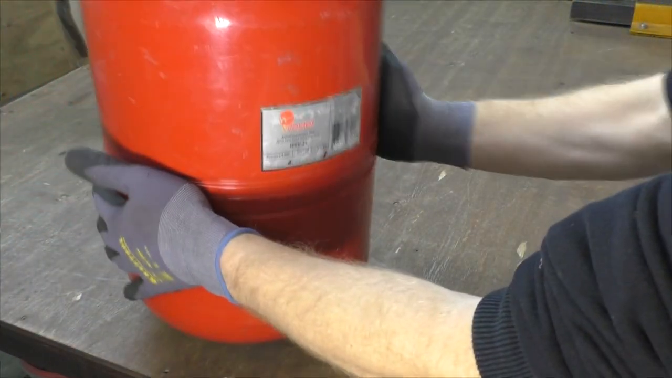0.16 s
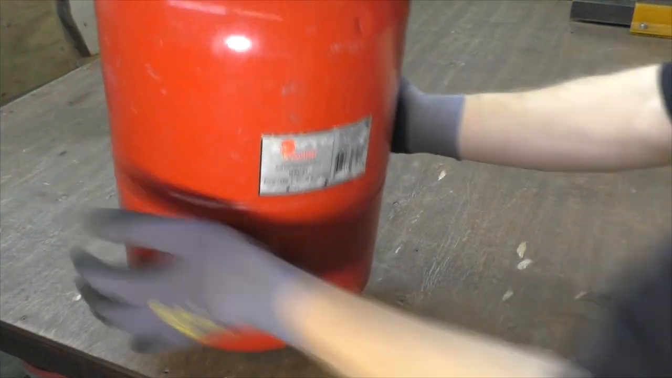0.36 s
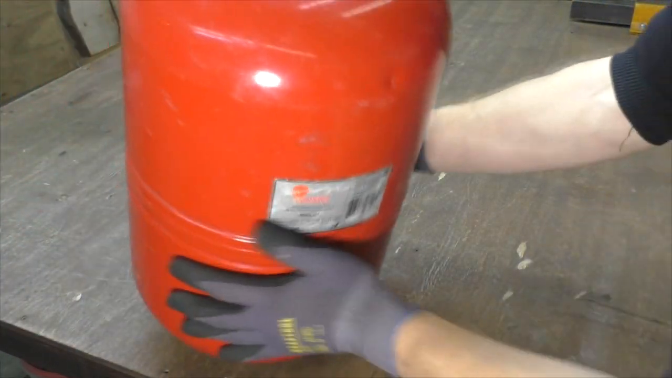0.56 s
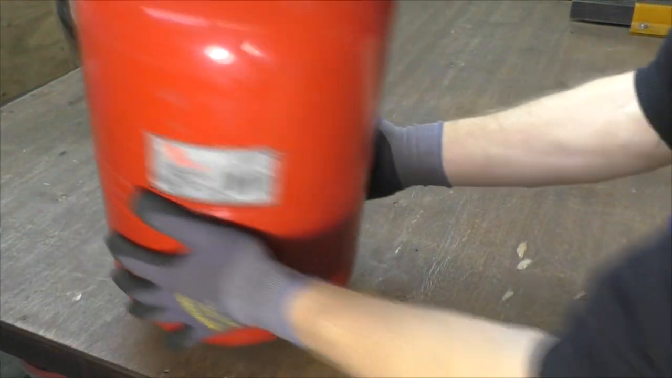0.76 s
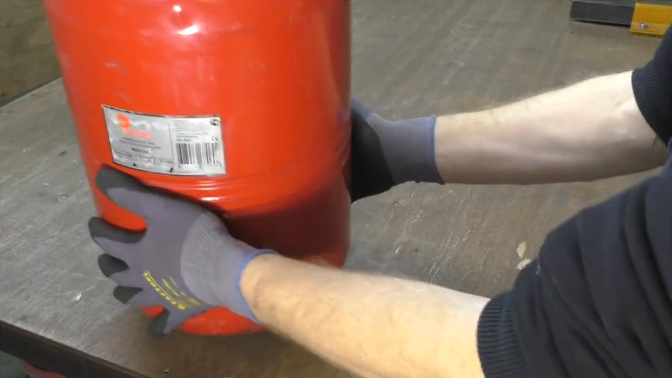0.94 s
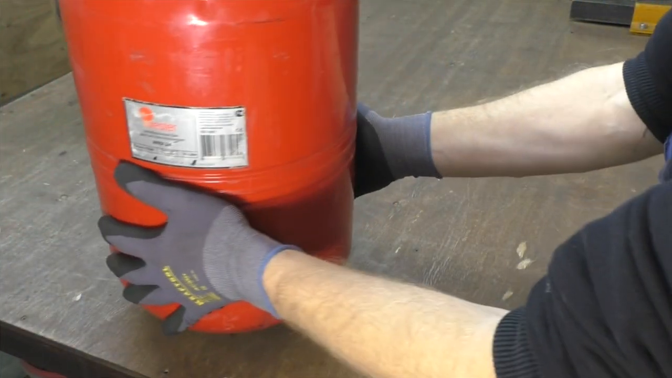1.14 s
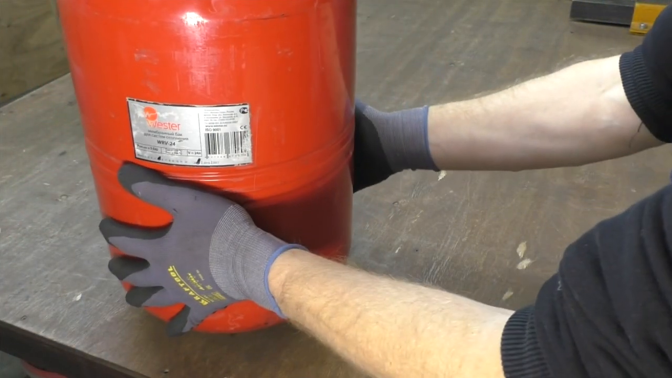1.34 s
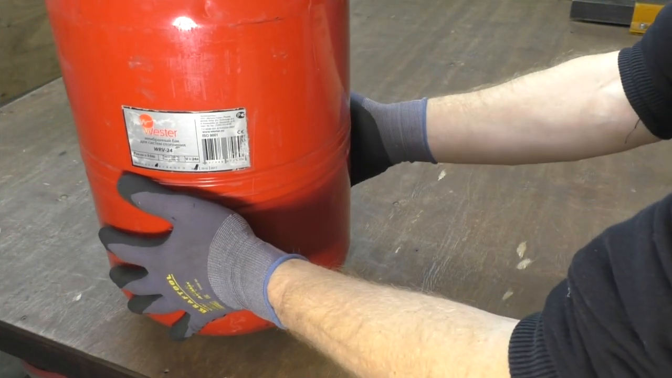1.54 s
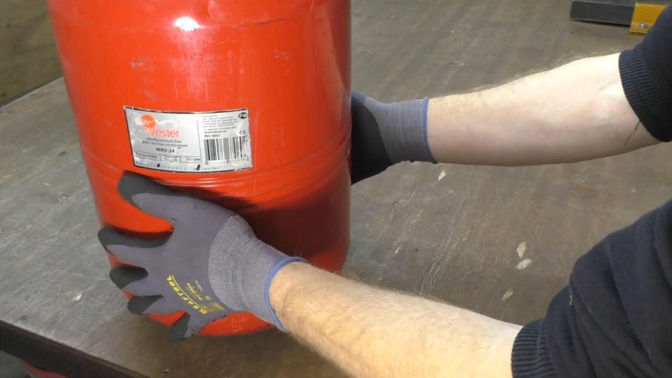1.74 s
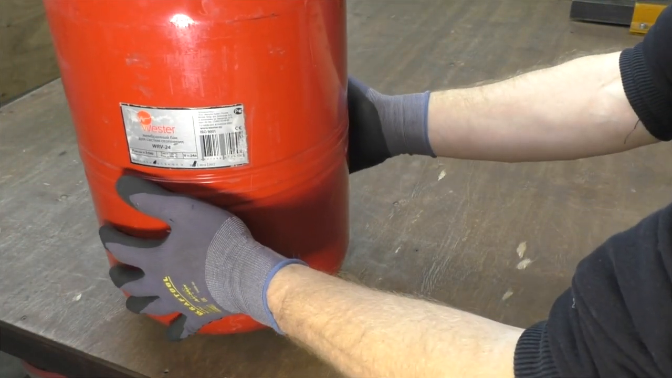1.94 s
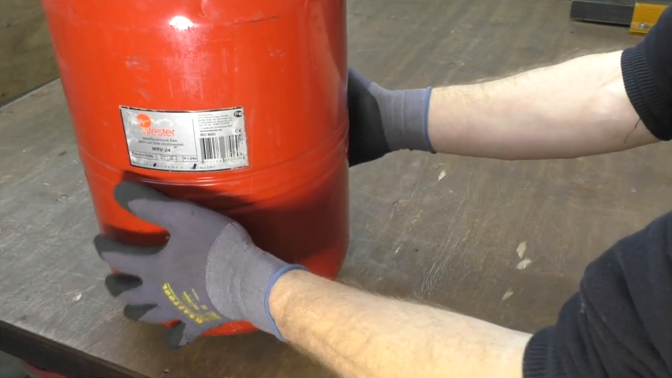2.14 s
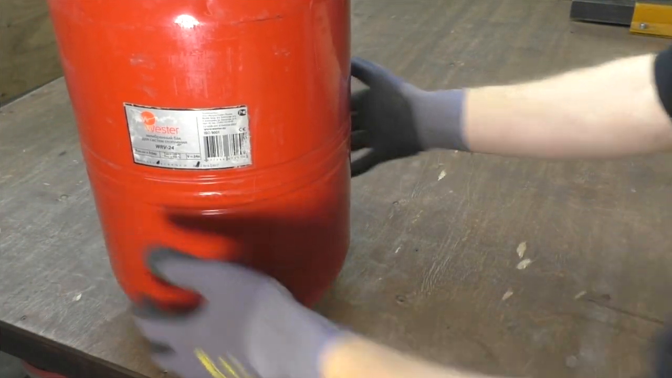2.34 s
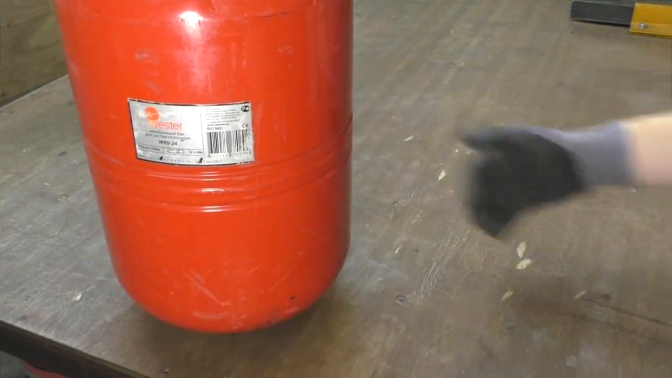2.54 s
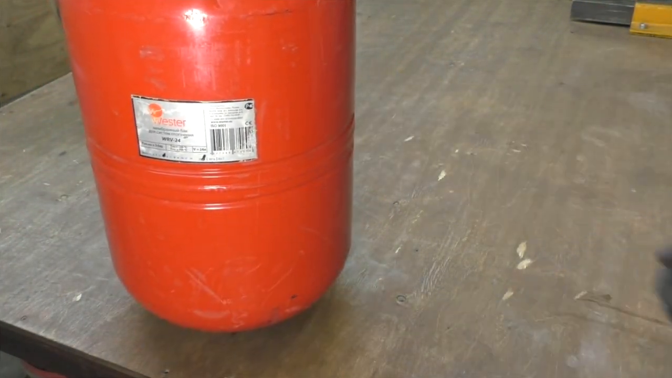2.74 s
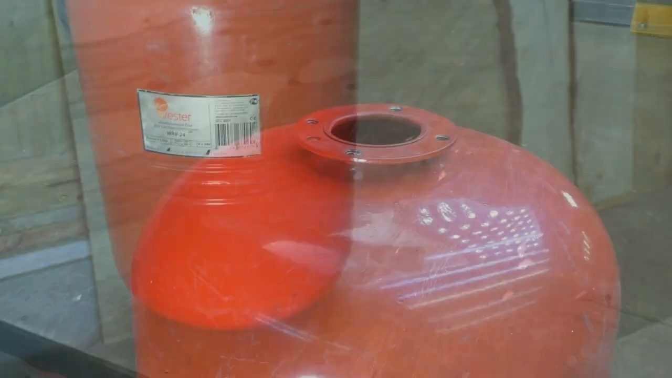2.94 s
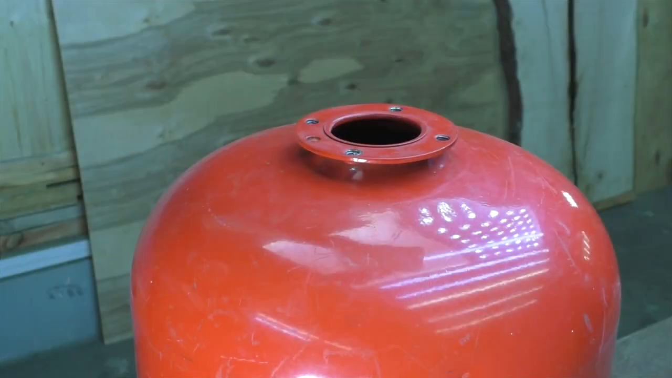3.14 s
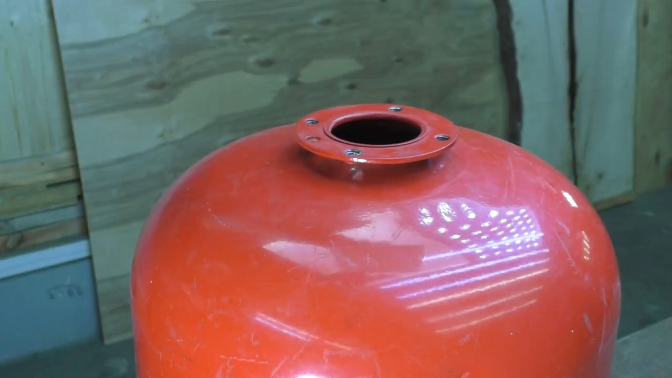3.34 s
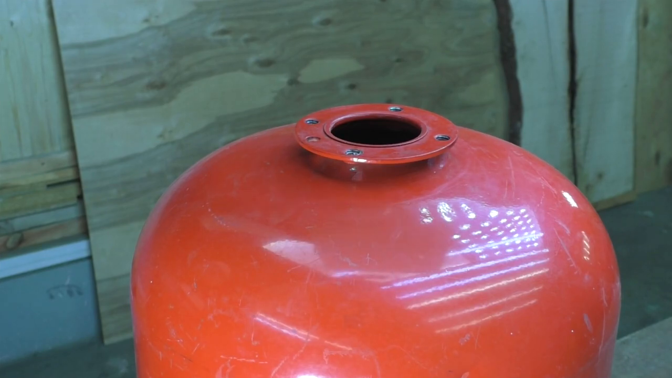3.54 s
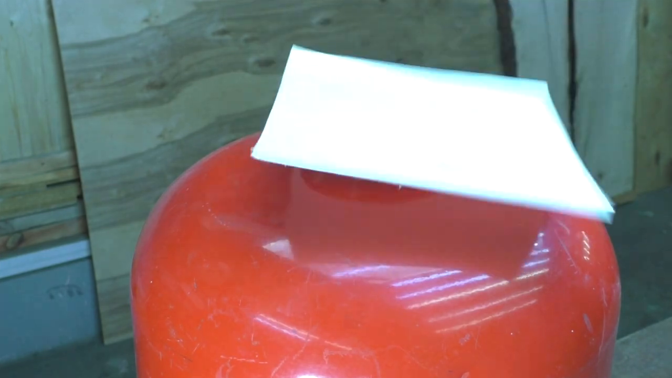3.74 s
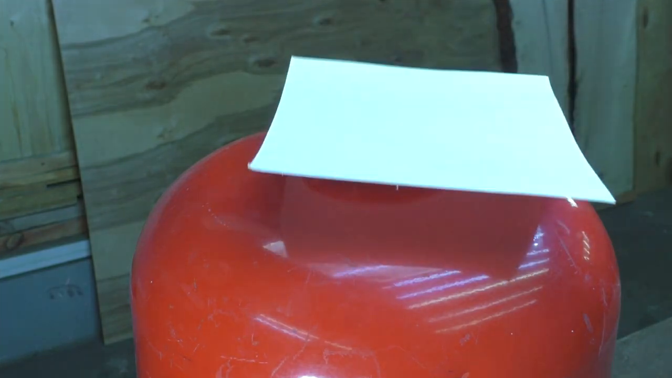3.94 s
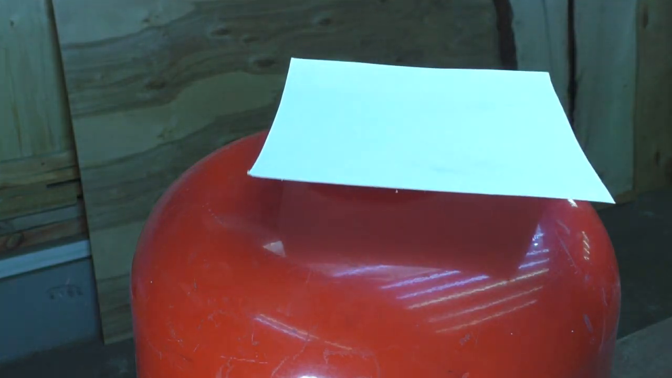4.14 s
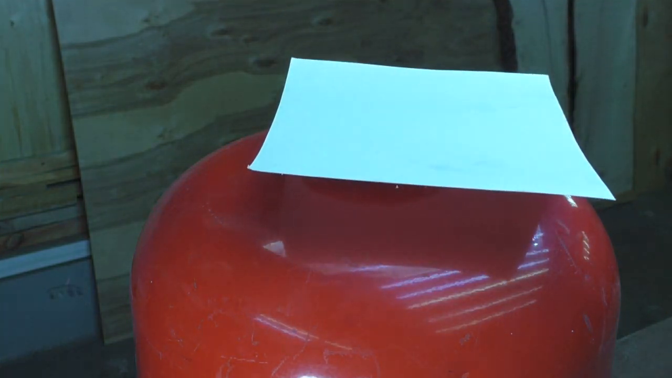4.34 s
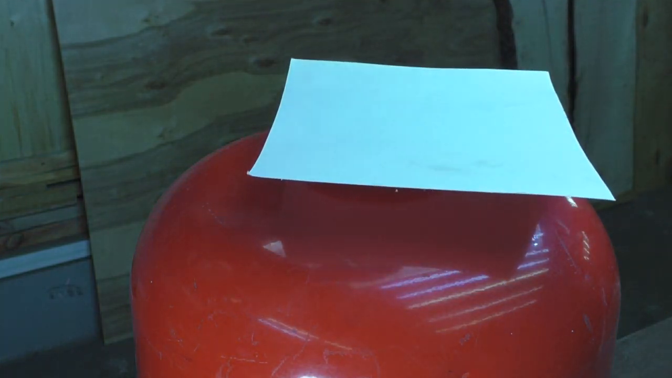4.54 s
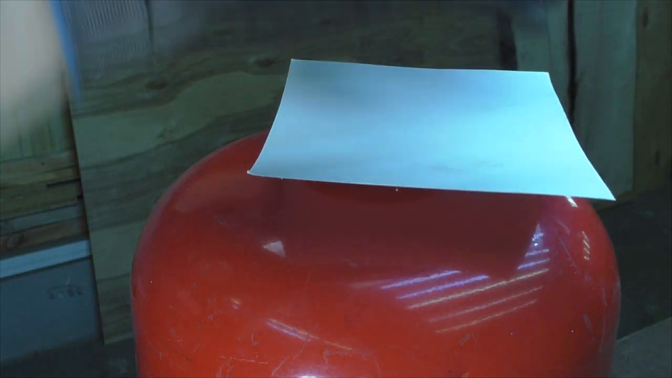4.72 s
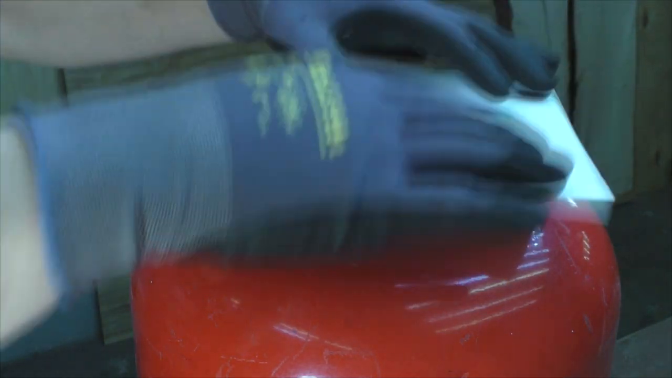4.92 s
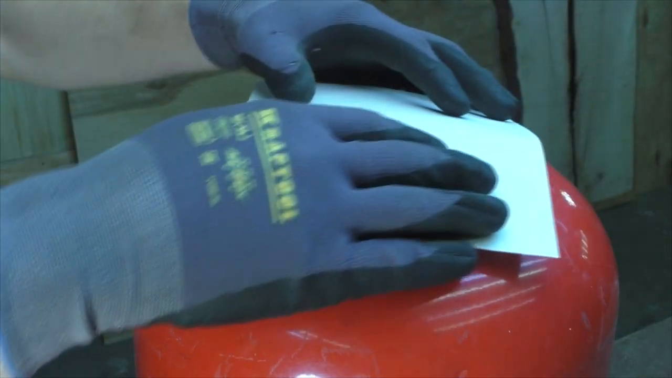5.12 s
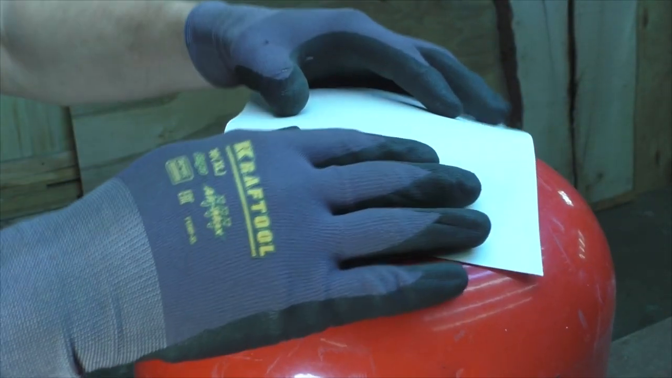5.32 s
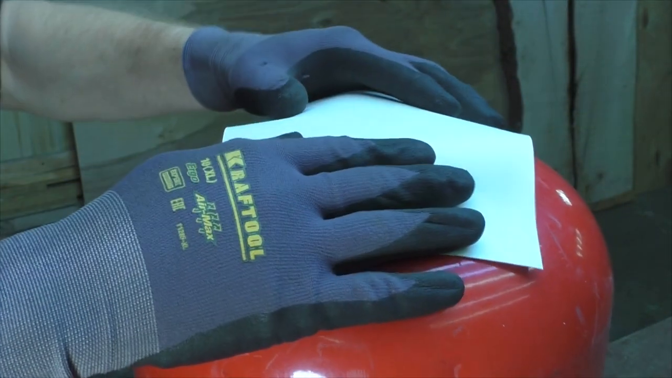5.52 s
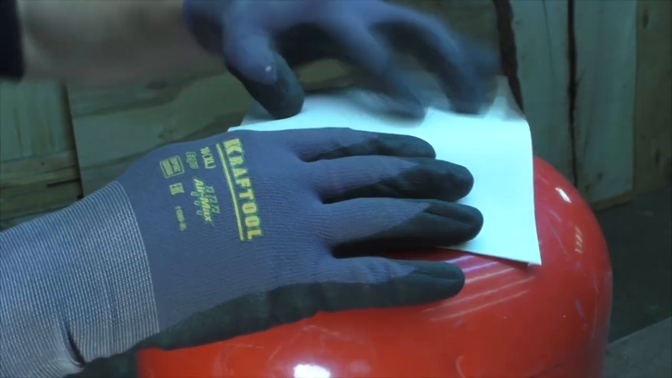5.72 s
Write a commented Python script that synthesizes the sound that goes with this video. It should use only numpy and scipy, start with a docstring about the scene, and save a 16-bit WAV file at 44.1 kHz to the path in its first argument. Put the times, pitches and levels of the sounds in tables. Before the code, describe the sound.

In a small quiet workshop, a faint scrape leads to a hard, hollow clang as an empty steel tank lands on a wooden bench. It grinds with a short high squeal, a low hum and lighter knocks, then settles. Near silence follows, with slight sleeve rustles. A stiff sheet slaps sharply on the metal, then gloved hands tap and rub it. Close stereo microphone, bench somewhat to the right.

```python
"""In a small, quiet workshop an empty steel tank is set down on a wooden bench, twisted and rocked to rest.
Then a stiff sheet of paper is slapped onto its flange, and gloved hands press and smooth it down.
Impacts are clicks, dense clangs and decaying shell modes; sliding is a train of random slips through
resonances; the squeal is unsteady tones and the hum one cavity tone. The bench lies a little to the right."""
import sys
import numpy as np
from scipy import signal
from scipy.fft import rfft, irfft, next_fast_len
from scipy.io import wavfile
from scipy.ndimage import map_coordinates

SR = 44100
rng = np.random.default_rng(int(sys.argv[2]) if len(sys.argv) > 2 else 0)


def file_out(sig):
    """Save sig as 16-bit WAV at sys.argv[1]."""
    # one column per channel
    cols = np.atleast_2d(sig).T
    # limit, then scale
    lim = np.clip(cols, -1, 1)
    pcm = np.round(lim * 32767).astype(np.int16)
    wavfile.write(sys.argv[1], SR, pcm)


N = 258867  # samples


def amp(db):
    """Level law: decibels to amplitude gain."""
    return 10 ** (np.asarray(db) / 20)


def unit(x):
    """Normalisation: x scaled to rms 1."""
    return x / np.sqrt(np.mean(x ** 2) + 1e-20)


def along(points, hz):
    """Logarithmic frequency scale: (Hz, value) points interpolated on a log axis."""
    f, v = np.transpose(points)
    return np.interp(np.log(hz + 1), np.log(f + 1), v)


def add(track, start_s, sound):
    """Superposition: mix a sound into the track from start_s on, cut at the end of the track."""
    part = track[..., round(start_s * SR):][..., :sound.shape[-1]]
    part += sound[..., :part.shape[-1]]


def filtered(x, response):
    """Linear filtering: the spectrum of x times a response of frequency."""
    n = x.shape[-1]
    padded = next_fast_len(n + 8192, True)
    hz = np.fft.rfftfreq(padded, 1 / SR)
    return irfft(rfft(x, padded) * response(hz), padded)[..., :n]


def resonance(f, centre_hz, width_hz, lift_db):
    """Damped resonator: a response of 1 that rises by lift_db at its centre."""
    damping = 1j * f * width_hz
    return 1 + (amp(lift_db) - 1) * damping / (centre_hz ** 2 - f * f + damping)


def wobble(rate):
    """Random modulation: a smooth curve through rate random knots a second."""
    knots = rng.standard_normal(int(N * rate / SR) + 4)
    return map_coordinates(knots, [np.arange(N) * rate / SR])


def swell(start, rise, hold, fade):
    """Envelope: a linear rise to 1, a hold and an exponential decay; all times in seconds."""
    t = np.arange(N) / SR - start
    return np.clip(t / rise, 0, 1) * np.exp(-np.maximum(t - rise - hold, 0) / fade)


def blend(pair, alike):
    """Interchannel coherence: two unrelated signals become a left and right of the given likeness."""
    turn = lambda hz: np.arccos(np.clip(along(alike, hz), -1, 1)) / 2
    mid, side = filtered(pair, lambda hz: np.array([np.cos(turn(hz)), np.sin(turn(hz))]))
    return np.array([mid + side, mid - side])


# Left-right likeness of sounds from the bench. Each row: frequency in Hz, likeness from 0 to 1.
BENCH_ALIKE = [(60, 0.92), (130, 0.93), (300, 0.33), (650, 0.074), (1400, 0.41), (7000, 0.32), (14000, 1)]


def tail(decay):
    """Diffuse decay: dense stereo noise of energy 1 in which each frequency dies at its own speed."""
    hz, t, z = signal.stft(rng.standard_normal((2, SR // 2)), SR, nperseg=256)
    fade = amp(-60 * t / along(decay, hz)[:, None])
    wash = signal.istft(z * fade, SR, nperseg=256)[1]
    wash = blend(wash, BENCH_ALIKE)
    return unit(wash) / np.sqrt(wash.shape[1])


def pulse(colour, thud_db, edge_db, size=4096):
    """Minimum-phase impulse: a click of the given colour, with more or less bass and treble."""
    hz = np.fft.rfftfreq(size, 1 / SR)
    thud = thud_db / (1 + (hz / 500) ** 4)
    edge = edge_db * hz ** 4 / (hz ** 4 + 4000 ** 4)
    gain = unit(amp(along(colour, hz))) * amp(thud + edge)
    # folding the cepstrum makes the click causal
    cepstrum = irfft(np.log(gain + 1e-6))
    cepstrum[1:size // 2] *= 2
    cepstrum[size // 2 + 1:] = 0
    # about rms 1 over 10 ms before thud and edge
    return irfft(np.exp(rfft(cepstrum))) * np.sqrt(SR / 100)


def ring(modes, scatter_db, spread):
    """Modal vibration: decaying shell modes at fresh strengths, each with its own phase in either channel."""
    hz, db, t60 = np.transpose(modes)[:, :, None]
    t = np.arange(SR) / SR
    size, phase, skew = rng.standard_normal((3, len(modes), 1))
    onset = 1 - np.exp(-t / .002)
    fade = amp(db + scatter_db * size - 60 * t / t60) * onset
    angle = 2 * np.pi * hz * t + np.pi * phase
    return np.array([np.sum(fade * np.sin(angle + side * spread * skew), 0) for side in (1, -1)])


def rattle(length):
    """Contact chatter: one hard touch, then noise with a decay constant of length seconds; energy 1."""
    t = np.arange(SR // 50) / SR
    chatter = blend(rng.standard_normal((2, len(t))), BENCH_ALIKE) * np.exp(-t / length)
    touch = unit(1. * (t == 0))
    # the chatter is too quick to move the low end, which follows the single push
    quick = filtered(unit(chatter), lambda hz: 2.0 * hz ** 2 / (hz ** 2 + 900 ** 2))
    return unit(touch + quick) / np.sqrt(len(t))


def blows(rows, colour, decay, direct_db, wash_db):
    """Impact excitation: each contact is a click and a dense clang; harder ones are brighter."""
    out = np.zeros((2, N))
    for start_s, db, thud_db, hard_db, clank_hz in rows:
        click = pulse(colour, thud_db, hard_db)
        # the spot that is struck favours one broad band of the shell
        click = filtered(click, lambda f: resonance(f, clank_hz, width_hz=193, lift_db=10.5))
        click = amp(db) * click[None]
        add(out, start_s, amp(direct_db) * signal.fftconvolve(click, rattle(0.0028), axes=1))
        add(out, start_s, amp(wash_db) * signal.fftconvolve(click, tail(decay), axes=1))
    return out


def friction(colour, resonances, rate, scatter_db):
    """Stick-slip noise: uneven tiny slips, rate a second, excite the body's resonances; stereo, rms 1."""
    happens = rng.random(N) < rate / SR
    slips = happens * amp(scatter_db * np.minimum(rng.exponential(size=N), 4))
    grains = blend(slips * rng.standard_normal((2, N)), BENCH_ALIKE)
    body = lambda f: 1 + sum(resonance(f, hz, width, lift) - 1 for hz, width, lift in resonances)
    return unit(filtered(grains, lambda f: amp(along(colour, f)) * body(f)))


# Spectrum of the room tone. Each row: frequency in Hz, relative level in dB per Hz.
AIR_COLOUR = [(15, -25), (30, -9), (110, -1.5), (340, -2.5), (600, -15.5), (1150, -7), (2200, -11.5),
              (2950, -10), (4600, -22), (7200, -26), (10000, -21), (15000, -20.5)]
# Left-right likeness of the room tone. Each row: frequency in Hz, likeness from 0 to 1.
AIR_ALIKE = [(60, 0.53), (250, 0.012), (4000, 0.0078), (7000, 0.076), (14000, 0.58)]


def room_tone():
    """Stationary noise: steady workshop air and microphone hiss as shaped, partly coherent noise."""
    air = blend(rng.standard_normal((2, N)), AIR_ALIKE)
    air = filtered(air, lambda hz: amp(along(AIR_COLOUR, hz)))
    return amp(-57.5) * unit(air)


# Swells of rustling noise: the broad ones before 3 s keep the workshop air a little louder in the first half, #
# the rest are arm movements. Each row: middle in seconds, relative level in dB, # time from the middle to 1/e
# of the power in seconds.
SWISHES = [(2.023, -64, 0.058), (2.363, -65.5, 0.12), (2.62, -61.5, .09), (2.87, -59.5, 0.11),
           (2.868, -52, 0.021), (3.113, -70, .017), (3.335, -67.5, 0.021), (3.397, -55, 0.013),
           (3.733, -60, 0.025), (4.259, -62, .025)]
# Spectrum of rustling cloth. Each row: frequency in Hz, relative level in dB per Hz.
CLOTH_COLOUR = [(350, -54.5), (600, -15), (1090, -2), (1520, -4), (1940, -5.5), (3650, -15.5),
                (12300, -22.5), (15000, -20)]


def sleeves():
    """Fibre friction: the background rustles a little louder until about 3 s, and clothing rustles faintly as
    each arm movement swells and fades."""
    t = np.arange(N) / SR
    power = sum(amp(db) ** 2 * np.exp(-((t - s) / half) ** 2) for s, db, half in SWISHES)
    return np.sqrt(power) * friction(CLOTH_COLOUR, [], rate=6600, scatter_db=0.8)


# The sheet brushing the dome, finger taps and short scuffs. Each row: start in seconds,
# relative level in dB, length in seconds, extra thud below 500 Hz in dB.
TAPS = [(3.876, -33.5, 0.024, 11.5), (3.921, -49.5, .039, 15), (4.780, -48, 0.0083, -17),
        (5.038, -36, 0.016, 15), (5.059, -36, 0.025, 8.5), (5.141, -40.5, .025, -32),
        (5.247, -46.5, .011, -23), (5.325, -35.5, 0.0058, 1), (5.4138, -38, .008, -13),
        (5.441, -45.5, .011, -12), (5.51, -44, 0.0097, 1), (5.61, -45, .014, -2), (5.685, -49, .0072, -12),
        (5.801, -34.5, 0.017, 2), (5.85, -37.5, .037, 3.5)]
# Spectrum of a tap. Each row: frequency in Hz, relative level in dB per Hz.
TAP_COLOUR = [(50, -21), (120, -3), (220, 0), (330, -1.5), (510, -7), (750, -16), (1100, 1), (1900, 3),
              (2600, 0.5), (3300, -6.5), (5000, -12), (7500, -14.5), (11000, -18), (15000, -34)]
# Modes of the tank struck at its top. Each row: frequency in Hz, relative level in dB, t60 in seconds.
TOP_MODES = [(165, -15, .53), (431, -6.5, .69), (842, -16, .99), (1227, -7.5, .64), (1410, -7.5, .54),
             (1497, -3.5, .5), (1610, -1, .56), (1825, -7, .7), (2148, -20, 1.0), (475, -6, .14),
             (1036, -6, .2), (1715, -8, .4), (1912, -3, .2), (1968, -4, .15), (2035, -3, .15),
             (2328, -20, .58), (2500, -22, .75), (2936, -9, .16), (3166, -24, .55)]


def finger_taps():
    """Short noise bursts: a touch scuffs the paper for milliseconds and faintly rings the dome."""
    out, t = np.zeros((2, N)), np.arange(SR // 10) / SR
    for start_s, db, length, thud_db in TAPS:
        touch = (1 - np.exp(-t / 0.0032)) / (1 + (t / length) ** 6)
        scuff = touch * blend(rng.standard_normal((2, len(t))), BENCH_ALIKE) / np.sqrt(SR / 100)
        click = pulse(TAP_COLOUR, thud_db, 0)[None]
        add(out, start_s, amp(db) * signal.fftconvolve(scuff, click, axes=1))
        add(out, start_s, amp(db - 29.5) * ring(TOP_MODES, scatter_db=1.5, spread=0.35))
    return out


# Gloved strokes over the sheet. Each row: start in seconds, relative level in dB,
# rise in seconds, decay constant in seconds.
STROKES = [(5.024, -39, 0.03, 0.1), (5.2, -57.5, 0.032, 0.18), (5.46, -51, 0.051, 0.052),
           (5.6, -58, 0.021, 0.16)]
# Spectra of palm thump, rubbing and hiss. Each row: frequency in Hz, relative level in dB per Hz.
PUSH_COLOUR = [(30, -48), (55, -29), (100, -0.5), (210, 5), (330, -7.5), (500, -5), (760, -24),
               (1050, -8.5), (1400, -33), (2200, -63)]
RUB_COLOUR = [(450, -34), (750, -13), (1100, 0.5), (1550, -8), (2000, 4), (2700, 2), (3500, -7),
              (5500, -16), (8000, -46)]
HISS_COLOUR = [(2350, -14), (4000, 0.5), (5870, -6.5), (7530, -5.5), (10400, -8.5), (14200, -13),
               (16000, -21)]
# Dome resonances under the rubbing. Each row: frequency in Hz, width in Hz, lift in dB.
DOME_RESONANCES = [(466, 66, 4), (1430, 32, 7), (1500, 38, 11), (1550, 54, 19), (2100, 80, 1),
                   (3030, 50, 8.5)]
PUSH_DB, PUSH_GROWS = -36, 2.15  # palm thump in the firmest stroke; dB for each dB of stroke
HISS_DB, HISS_LAG_S = -3, 0.011  # relative to the stroke; the glove grips before it slides


def smoothing():
    """Dry friction: palms rub the sheet onto the dome, catching and slipping; only a firm stroke thumps."""
    def effort(lag):
        return np.sqrt(sum((amp(db) * swell(s + lag, rise, 0, fade)) ** 2 for s, db, rise, fade in STROKES))
    rub = effort(0)
    grip = unit(amp(0.79 * wobble(110)))
    push = amp(PUSH_DB) * (rub / rub.max()) ** PUSH_GROWS
    low = push * friction(PUSH_COLOUR, DOME_RESONANCES, rate=1500, scatter_db=0.5)
    middle = amp(3.0) * rub * friction(RUB_COLOUR, DOME_RESONANCES, rate=1700, scatter_db=2.0)
    slide = amp(HISS_DB) * effort(HISS_LAG_S)
    high = slide * friction(HISS_COLOUR, DOME_RESONANCES, rate=8900, scatter_db=0.5)
    return low + grip * (middle + high)


# Paper meets flange. Each row: start in seconds, relative level in dB, extra thud below 500 Hz in dB,
# hardness as extra treble in dB, clank frequency in Hz.
SLAPS = [(3.7855, -22, 2.5, 1.5, 2150), (3.7945, -27, -8.5, -0.5, 1640), (3.8032, -17.5, -9, -0.5, 1770),
         (3.8125, -22.5, -3.5, -20, 1700), (3.9130, -35, 11.5, 6, 1500)]
# Spectrum of a slap. Each row: frequency in Hz, relative level in dB per Hz.
SLAP_COLOUR = [(30, -26), (70, -6.5), (125, -1), (240, -3), (330, -9), (520, -2), (740, -16), (1000, -1.5),
               (1350, -11.5), (1850, -4), (2500, -5), (4000, -18), (6500, -19), (11000, -20), (15000, -32)]
# Decay of the slap's clang. Each row: frequency in Hz, t60 in seconds.
SLAP_DECAY = [(100, 0.27), (500, 0.066), (1700, 0.064), (4000, 0.082), (12000, 0.073)]
# Sharp snaps of the sheet. Each row: start in seconds, relative level in dB.
SNAPS = [(3.7851, -19), (3.7868, -20.5), (3.914, -46), (4.041, -56), (4.784, -55.5)]
# Spectrum of a snap. Each row: frequency in Hz, relative level in dB.
SNAP_COLOUR = [(100, -25), (750, -21), (1250, -18), (1650, -15), (2150, -2.5), (3000, -4), (4300, 1),
               (5700, -3.5), (6900, -16.5), (9800, -1.5), (12000, -5), (15500, -16)]
DOME_S, DOME_DB = 3.803, -31.5  # the dome starts to ring as the sheet lands flat


def paper_slap():
    """Impact of a stiff sheet: it snaps against the flange, flaps and settles; the dome's modes ring."""
    out = blows(SLAPS, SLAP_COLOUR, SLAP_DECAY, direct_db=-5.5, wash_db=-7)
    add(out, DOME_S, amp(DOME_DB) * ring(TOP_MODES, scatter_db=1.6, spread=0.46))
    for start_s, db in SNAPS:
        snap = amp(db) * pulse(SNAP_COLOUR, 0, 0)
        add(out, start_s, amp(-4.5) * snap)
        # the sheet buzzes briefly, t60 20 ms
        buzz = signal.fftconvolve(snap[None], tail([(1000, 0.02)]), axes=1)
        add(out, start_s, amp(-9.0) * buzz)
    return out


# Modes that the twisting sustains. Each row: frequency in Hz, relative level in dB.
SQUEAL_TONES = [(5325, -4), (5730, 8), (5850, -3), (6650, -14)]
SQUEAL_S, SQUEAL_DB = .265, -42  # the twisting base starts to sing
SQUEAL_RISE_S, SQUEAL_HOLD_S, SQUEAL_FADE_S = 0.1, 0.14, 0.079


def tank_squeal():
    """Stick-slip oscillation: while the base twists, a few high modes sing unsteadily."""
    tones = 0
    for hz, db in SQUEAL_TONES:
        pitch = hz + 10 * wobble(16) + 120 * wobble(900)
        level = amp(db + 4.2 * wobble(70.3))
        tones += level * np.sin(2 * np.pi * np.cumsum(pitch) / SR)
    envelope = swell(SQUEAL_S, SQUEAL_RISE_S, SQUEAL_HOLD_S, SQUEAL_FADE_S)
    return amp(SQUEAL_DB) * envelope * unit(tones)


# How hard the base scrapes as it is twisted and slows to rest. Each row: time in seconds, level in dB.
SCRAPE = [(0.0, -47.5), (0.19, -45.5), (0.26, -41), (0.37, -31), (0.55, -40), (0.641, -46.5), (0.73, -42.5),
          (0.83, -52.5), (0.919, -56), (1.05, -51), (1.13, -61.5), (1.25, -56.5), (1.5, -59.5), (1.8, -74)]
SCRAPE_REF_DB = -40  # the scrape at which the gain is 1


def scrape(grows):
    """Power law of friction: a gain that grows by so many dB for each dB of scraping."""
    s, db = np.transpose(SCRAPE)
    t = np.arange(N) / SR
    rest = np.exp(-np.maximum(t - 1.66, 0) / 0.081)  # dies away from 1.66 s on
    return amp(grows * (np.interp(t, s, db) - SCRAPE_REF_DB)) * rest


# Spectra of the three bands of sliding. Each row: frequency in Hz, relative level in dB per Hz.
RUMBLE_COLOUR = [(50, -10), (85, -3), (103, -2), (129, -5), (265, -3.5), (356, -10.5), (438, -3),
                 (474, -16.5), (900, -42), (1170, -58), (1980, -120)]
GRIND_COLOUR = [(380, -100), (650, 3.5), (791, -5), (1150, -0.5), (1340, -1), (1480, 4.5), (1780, 1),
                (2610, 3.5), (3130, -1.5), (5000, -12), (6500, -30), (11000, -120)]
GRIT_COLOUR = [(2400, -10.5), (4000, -2.5), (5000, -3.5), (6400, -4.5), (7500, -6), (9700, -4.5),
               (13000, -8.5), (16000, -13)]
# Shell resonances that the sliding excites. Each row: frequency in Hz, width in Hz, lift in dB.
SINGING = [(135, 7, 13), (210, 14, 6), (262, 8, 6), (334, 12, 9), (440, 5, 11), (725, 30, 6),
           (1180, 60, 10), (1606, 20, 5), (2147, 30, 6), (2532, 30, 6), (2700, 50, 8), (4562, 60, 5)]
RUMBLE_DB, GRIND_DB, GRIT_DB = -40.5, -45, -45  # at the reference scrape
RUMBLE_GROWS, GRIND_GROWS, GRIT_GROWS = 1.31, 0.9, 1.13  # dB for each dB of scrape
LANDING_S = .195  # the weight comes down
LIFTED_DB = -16.5  # less rumble while the hands still carry the weight


def tank_slide():
    """Sliding friction: the base grinds the dust on the boards, catching, and rumbles under its weight."""
    catch = unit(amp(1.5 * wobble(90)))
    weight = amp(LIFTED_DB * (np.arange(N) / SR < LANDING_S))
    low = amp(RUMBLE_DB) * weight * scrape(RUMBLE_GROWS)
    low = low * friction(RUMBLE_COLOUR, SINGING, rate=1300, scatter_db=2.0)
    middle = amp(GRIND_DB) * scrape(GRIND_GROWS)
    middle = middle * friction(GRIND_COLOUR, SINGING, rate=1900, scatter_db=1.5)
    high = amp(GRIT_DB) * scrape(GRIT_GROWS)
    high = high * friction(GRIT_COLOUR, [], rate=9000, scatter_db=1.5)
    return low + catch * (middle + high)


CAVITY_HZ = 71.9  # the air in the tank, resonating through its neck
HUM_DB, HUM_T60_S = -1.2, 1.2  # level relative to RUMBLE_DB
BOOM_DB, BOOM_RISE_S = -31, 0.024  # the landing shoves the air once


def tank_hum():
    """Helmholtz resonance: enclosed air booms at the landing, stores the base's shaking and lets it go."""
    t = np.arange(N) / SR - LANDING_S
    keep = amp(-60 / (HUM_T60_S * SR)) ** 2  # energy kept from one sample to the next
    stored = np.sqrt(signal.lfilter([1 - keep], [1, -keep], scrape(grows=1.48) ** 2))
    u = np.maximum(t, 0) / BOOM_RISE_S
    boom = amp(BOOM_DB) * (u * np.exp(1 - u)) ** 2
    level = amp(RUMBLE_DB + HUM_DB) * stored + boom
    return level * np.sqrt(2) * np.sin(2 * np.pi * CAVITY_HZ * t)


# Base meets bench. Each row: start in seconds, relative level in dB, extra thud below 500 Hz in dB,
# hardness as extra treble in dB, clank frequency in Hz.
KNOCKS = [(0.1971, -14, 3.5, 0, 1520), (0.212, -31, 5.5, 3, 1500), (0.2229, -27, 17, -1, 1250),
          (.2308, -15.5, -10, -0.5, 2900), (0.2458, -31.5, -10.5, 6.5, 3440),
          (0.2921, -27.5, 5.5, -5, 1420), (.3290, -24, 5.5, 0.5, 2150), (.5822, -44, -3, 16.5, 2300),
          (.6580, -29.5, 3.5, 15, 2085), (.6919, -35.5, 0, 10, 1460), (.7080, -34.5, 5, 9, 1950),
          (.7450, -47, 14, 4, 1460), (0.9309, -46, -12, 3, 2430), (1.1983, -55, -4, 6, 1590),
          (1.4972, -46.5, -16, -10, 1130)]
# Spectrum of a knock. Each row: frequency in Hz, relative level in dB per Hz.
KNOCK_COLOUR = [(30, -25.5), (60, -5), (120, 3.5), (210, 3), (480, 0.5), (780, -21), (1050, -6.5),
                (1550, -6), (2300, -11), (3500, -15), (5200, -23.5), (7000, -28.5), (15000, -34.5)]
# Decay of the knock's clang. Each row: frequency in Hz, t60 in seconds.
KNOCK_DECAY = [(100, 0.17), (400, 0.1), (1600, 0.16), (4000, 0.24), (12000, 0.16)]
# Modes of the tank struck at its base. Each row: frequency in Hz, relative level in dB, t60 in seconds.
BASE_MODES = [(143.3, -2, 0.37), (280, -5, 0.4), (333.5, -4, 0.42), (450, -20, 0.79), (746, -17.5, 0.55),
              (1120, -19, 0.22), (1230, -28, 0.26), (1250, -28, 0.32), (1422, -5.5, 0.25),
              (1490, -24, 0.27), (1433, -1.5, 0.19), (1594, -1, 0.14), (1670, -11, .2), (1880, -13, 0.32),
              (1997, -0.5, 0.1865), (2085, -20, 0.31), (2150, -14, 0.41), (2300, -15, 0.6),
              (2383, -6.5, 0.37), (2950, -17, .25), (3440, -16, .25)]
BASE_RING_DB = -17.5  # the shell's ring under a knock of plain hardness
RING_PER_HARDNESS = 0.99  # dB of shell ring for each dB of hardness


def tank_knocks():
    """Impact and modal ringing: the tank lands and rocks; hard contacts ring most, above all near the clank."""
    out = blows(KNOCKS, KNOCK_COLOUR, KNOCK_DECAY, direct_db=-4.5, wash_db=-3.5)
    hz, mode_db, t60 = np.transpose(BASE_MODES)
    for start_s, db, _, hard_db, clank_hz in KNOCKS:
        favour_db = 7 / (1 + ((hz - clank_hz) / 90) ** 2)
        shell = ring(np.c_[hz, mode_db + favour_db, t60], scatter_db=1.0, spread=0.37)
        add(out, start_s, amp(db + RING_PER_HARDNESS * hard_db + BASE_RING_DB) * shell)
    return out


# Decay of the room. Each row: frequency in Hz, t60 in seconds.
ROOM_DECAY = [(100, 0.46), (1500, 0.42), (5000, 0.4), (14000, 0.11)]
# Level difference of the bench. Each row: frequency in Hz, left minus right in dB.
LEAN = [(60, 5), (120, -2.5), (200, -1), (380, -9.5), (700, -10.5), (1300, -8), (2400, -5), (7000, -7),
        (15000, 0)]


def scene():
    """Direct and reverberant sound: the bench leans mostly right and, but for the hum, excites the room."""
    handling = sleeves() + finger_taps() + smoothing() + paper_slap()
    near = handling + tank_squeal() + tank_slide() + tank_knocks()
    late = np.pad(tail(ROOM_DECAY), ((0, 0), (SR // 150, 0)))  # the room answers 1/150 s late
    room = amp(-11.0) * signal.fftconvolve(near, late, axes=1)[:, :N]
    sides = lambda hz: amp(np.outer([.5, -.5], along(LEAN, hz)))
    bench = filtered(near + room + tank_hum(), sides)
    return bench + amp([[-.7], [.7]]) * room_tone()


TOP_HZ = 15900  # upper band limit


def record(dry):
    """Band limiting: a high-pass thins the bass below 35 Hz and a steep cut removes the highest treble."""
    high_pass = signal.butter(2, 35, "highpass", fs=SR, output="sos")
    thinned = signal.sosfilt(high_pass, dry)
    return filtered(thinned, lambda hz: 1 / (1 + (hz / TOP_HZ) ** 120))


dry = scene()
out = record(dry)
file_out(out)
```